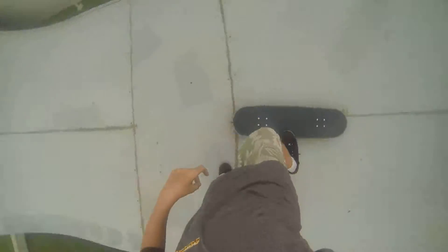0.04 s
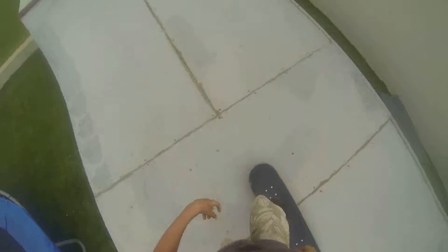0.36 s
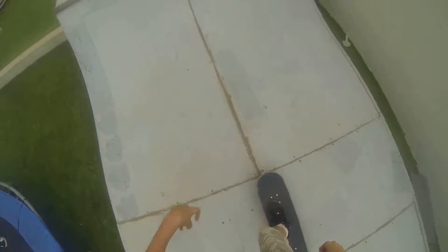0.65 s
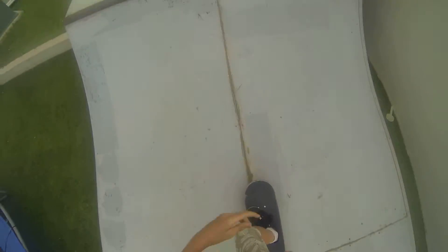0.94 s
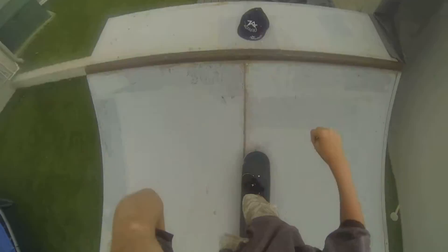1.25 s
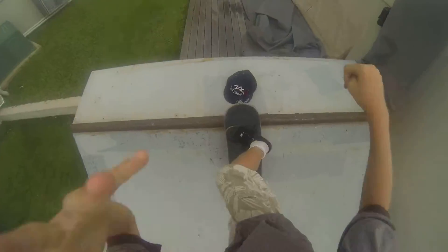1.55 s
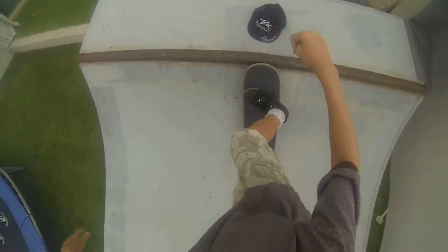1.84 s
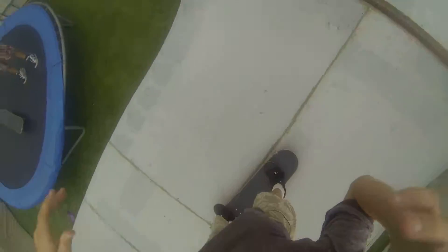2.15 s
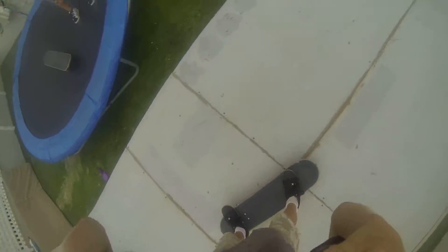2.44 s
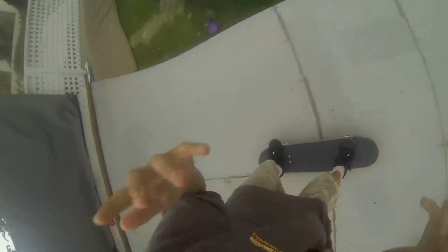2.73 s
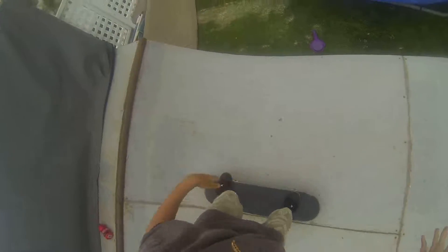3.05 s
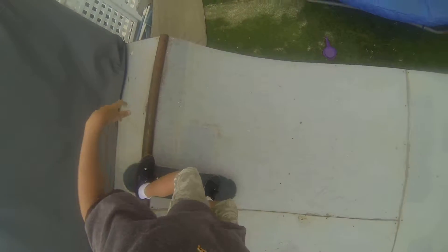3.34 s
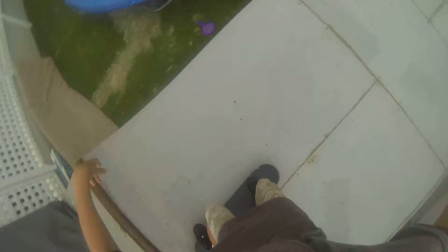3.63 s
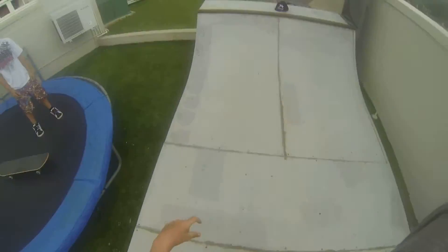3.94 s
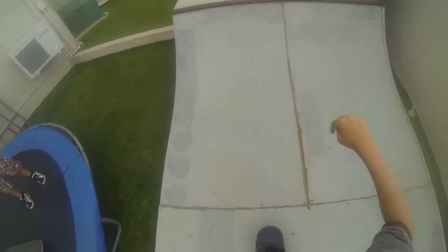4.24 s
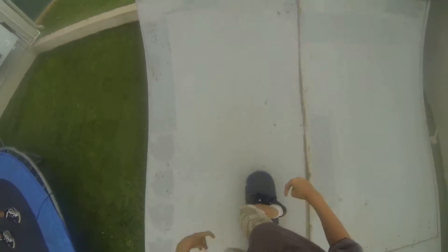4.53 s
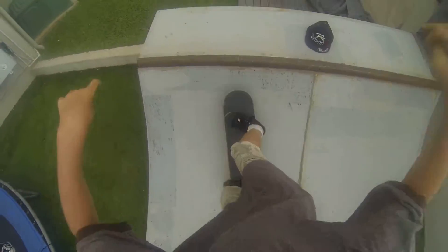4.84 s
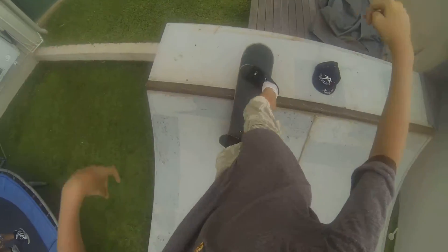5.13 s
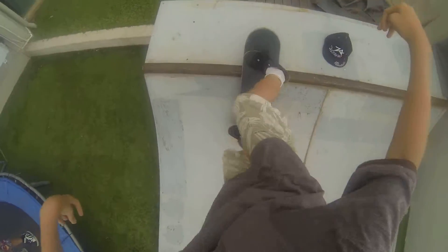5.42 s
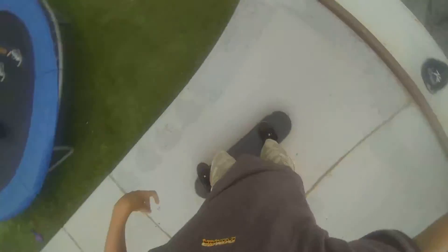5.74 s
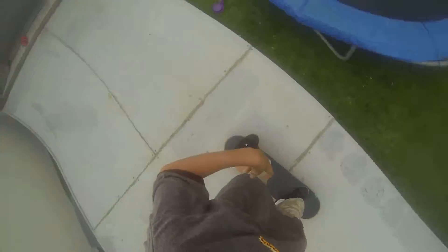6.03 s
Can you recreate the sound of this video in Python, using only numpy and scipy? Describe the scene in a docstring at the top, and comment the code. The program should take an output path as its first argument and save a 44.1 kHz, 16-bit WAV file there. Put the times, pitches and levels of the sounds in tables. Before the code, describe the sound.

A skateboard rolls back and forth on a wooden ramp with hollow rumble, sharp clacks, brief scrapes and low thumps on the microphone.

```python
"""On a plywood mini ramp, a skateboard rides back and forth, heard from a head-worn camera in a case.
The wheels hum, slide in the turns and knock over the panel joints. The deck (the wooden board) and
trucks (its metal axles) clack and grind on the ramp and its coping (the rail along the top edge).
The rider's movements thump the closed case, and each big thump turns the camera's volume down briefly.
Behind it all are dry ticks, a thin whine and the faint hiss of the electronics."""
import sys
import numpy as np
from scipy import signal
from scipy.fft import rfft, irfft
from scipy.io import wavfile

SR = 44100
rng = np.random.default_rng(int(sys.argv[2]) if len(sys.argv) > 2 else 0)


def wav_record(signal):
    """Record a signal, one row per channel, as 16-bit PCM in the file named by sys.argv[1]."""
    frames = np.transpose(np.atleast_2d(signal))
    bounded = np.clip(frames, -1, 1)
    # unit amplitude maps onto the largest positive 16-bit level
    quanta = np.round(bounded * 32767).astype(np.int16)
    wavfile.write(sys.argv[1], SR, quanta)


N = 272525
TIME = np.arange(N) / SR


# The tone of the flat floor, the curved wall and the humming wheels: pitch_hz, level_db
FLOOR_TONE = [(60, -21.5), (120, 1), (240, 0.5), (330, -10), (500, -20.5), (750, -20), (1100, -21.5),
              (1800, -33.5), (4000, -78.5)]
WALL_TONE = [(100, -20.5), (220, -13.5), (340, -1), (450, 0.5), (580, -0.5), (720, -7.5), (1100, -36),
             (1800, -24.5), (4000, -40)]
WHEEL_TONE = [(400, -44.5), (900, -4), (1180, -3), (1450, 4.5), (1750, -5.5), (2100, -13), (2600, -18.5),
              (5000, -25), (12000, -52)]
# How the rolling swells and fades: time_s, drum_db, hum_db (each before its trim)
ROLLING_LEVELS = [(0.0, -56, -60), (0.14, -54.5, -63), (0.79, -55, -51), (1.29, -50, -57.5),
                  (1.8, -57.5, -50.5), (2.11, -53, -49.5), (2.5, -48, -58), (2.66, -48, -87),
                  (2.83, -53, -53), (3.24, -51.5, -52), (3.59, -61, -62), (3.98, -52, -50.5),
                  (4.6, -51.5, -52.5), (4.92, -46.5, -48), (5.11, -66, -56.5), (5.76, -44, -50),
                  (5.94, -49, -49), (6.16, -47.5, -52.5)]

def rolling_wheels(drum_trim_db=2, hum_trim_db=-3.5, grit_db=1.5, bumps_db=2.0, bumps_per_s=70):
    """Wheels run over rough paint: the hollow ramp drums, and the wheels hum and scrub."""
    drum_db, hum_db = curves(ROLLING_LEVELS)
    slide, rasp = turns()
    blend = tone_blend(TIME)
    floor = np.sqrt(1 - blend) * with_tone(grit(N, grit_db), FLOOR_TONE)
    wall = np.sqrt(blend) * with_tone(grit(N, grit_db), WALL_TONE)  # bent wood is stiffer, so higher
    # Sliding makes the ramp drum too.
    drum = np.hypot(from_db(drum_db + drum_trim_db), from_db(0.5) * slide) * (floor + wall)
    hum = from_db(hum_db + hum_trim_db) * with_tone(grit(N, grit_db), WHEEL_TONE)
    wheels = drum + hum + wheel_scrub(slide, rasp)
    return wheels * from_db(bumps_db * drift(bumps_per_s))


# Sideways slides of the wheels: peak_s, slide_db, rise_s, fall_s, rasp_db
TURNS = [(.16, -48.5, 0.049, 0.069, -60), (.585, -47.5, 0.04, 0.031, -56.5), (.77, -56, 0.097, 0.033, -60),
         (1.14, -69, 0.032, .04, -75.5), (1.409, -54.5, 0.21, 0.38, -61.5), (1.62, -44, 0.079, 0.046, -55),
         (1.811, -46.5, 0.042, 0.03, -54.5), (1.93, -47.5, 0.054, 0.07, -62),
         (2.02, -47.5, 0.011, 0.023, -69), (2.26, -43.5, 0.038, 0.052, -55), (2.464, -48, 0.07, 0.053, -55),
         (2.61, -49, 0.035, 0.04, -53), (2.765, -45.5, 0.14, 0.068, -55.5), (3.51, -53.5, 0.017, 0.11, -67),
         (3.76, -53, 0.049, 0.12, -68), (3.971, -47.5, 0.04, 0.062, -52.5),
         (5.23, -46.5, 0.073, 0.08, -52.5), (5.38, -49, 0.031, 0.06, -58.5),
         (5.544, -43.5, 0.024, 0.032, -53)]

def turns():
    """How hard the wheels slide and rasp: both swell and die away in each turn."""
    slide, rasp = np.zeros(N), np.zeros(N)
    for peak_s, slide_db, rise_s, fall_s, rasp_db in TURNS:
        width_s = np.where(TIME < peak_s, rise_s, fall_s)
        swell = np.exp(-((TIME - peak_s) / width_s) ** 2)
        slide += from_db(slide_db) * swell
        rasp += from_db(rasp_db) * swell
    return slide, rasp


# The tone of sliding wheels and of their brighter rasp: pitch_hz, level_db
SCRUB_TONE = [(500, -14.5), (900, 2.5), (1450, 10), (2100, -1.5), (2700, -32), (3600, -22.5), (4400, -24),
              (5500, -19), (8000, -21.5), (11500, -41.5), (15000, -52)]
RASP_TONE = [(1200, -13), (2000, 7), (2600, 6.5), (3100, 2), (3700, 2), (4400, -7), (5300, -4.5),
             (8000, -30), (14000, -42)]

def wheel_scrub(slide, rasp):
    """Wheels dragged sideways make a coarse rubbing noise with a rasp on top."""
    rubbing = slide * with_tone(grit(N, spread_db=6.5), SCRUB_TONE)
    return rubbing + rasp * with_tone(grit(N, spread_db=6.0), RASP_TONE)


def wheel_squeak(start_s=3.712, pitch_hz=2750, fall_octaves_per_s=24, length_s=0.011):
    """A wheel sticks and slips for a moment in a turn, at a rough, falling pitch."""
    age = np.clip((TIME - start_s) / length_s, 0, 10)  # time since the start, in units of length_s
    waver = 1 + 0.0506 * drift(per_s=900)
    hz = pitch_hz * 2 ** (-fall_octaves_per_s * length_s * age) * waver
    swell = 2 * np.sqrt(age) * np.exp(-age ** 2 / 2)
    return from_db(-49) * swell * np.sin(2 * np.pi * np.cumsum(hz) / SR)


# The tone of the board when hit or scraped: pitch_hz, level_db
BOARD_TONE = [(80, -15), (250, 5), (370, -3.5), (600, -1.5), (950, -5), (1150, -6.5), (1450, -2),
              (2100, -12), (3000, -18), (5000, -27), (7000, -37.5), (11000, -45), (15000, -43)]
# Deck and trucks hit the ramp or coping:
# start_s, strike_db, rattle_db, decay_s, bright_db_per_octave, boom_db, boom_hz, deck_hz
CLACKS = [ (0.184, -52, -36.5, 0.011, 6, 16, 427, 1860), (.728, -49, -44, 0.0049, 14, -3, 400, 2300),
          (0.795, -44, -38.5, 0.0046, 11, 4, 300, 2270), (1.051, -46, -39.5, 0.0033, 10.5, 3, 400, 1850),
          (1.1716, -19, -20.5, 0.0069, 5.5, 6, 590, 2150), (1.201, -22, -22, 0.0045, 9.5, -15, 350, 1800),
          (1.2114, -44, -38, .002, 16, -2, 400, 2110), (1.428, -46, -38, 0.0054, 17, 28.5, 605, 1510),
          (1.459, -23.5, -37, 0.012, 7.5, 10, 466, 1230), (1.481, -21, -24, 0.006, 5.5, -2, 605, 2060),
          (1.564, -34, -20.5, 0.015, 5.5, 9, 520, 1320), (1.801, -34, -40, .005, 10, 13, 500, 1400),
          (1.815, -33, -29.5, 0.0059, 6, 12, 500, 1440), (1.893, -28, -35, 0.0091, 6, 10, 610, 1400),
          (2.187, -30, -19.5, 0.0057, 7.5, 26.5, 334, 1790), (2.286, -33, -35, .004, 4, 0, 500, 1900),
          (2.3284, -2.5, -29, 0.0068, -19, -32, 760, 1354),
          (2.3304, -12.5, -19.5, 0.0058, 4, -6, 606, 2110), (2.644, -34, -28, 0.0029, 12, 12.5, 420, 1720),
          (2.821, -45, -40, 0.015, 6, 8, 595, 1400), (3.145, -42, -45, 0.042, -38, 19, 443, 1380),
          (3.339, -19.5, -25.5, 0.012, -6, 5.5, 470, 1620), (3.351, -37, -39, .005, 12.5, 9, 480, 1590),
          (3.469, -37, -30.5, 0.025, -8, 11.5, 323, 1370), (3.713, -36, -36.5, 0.013, 0.5, -9, 660, 1450),
          (4.9494, -26, -18.5, 0.011, 2.5, 13, 520, 1400), (5.008, -43, -42, .004, 18, 0, 520, 1430),
          (5.1228, -5.5, -15.5, 0.0048, 6.5, 11.5, 756, 1517),
          (5.328, -41, -36.5, 0.0059, 11, 9, 600, 1600), (5.36, -37, -29, 0.006, 1.5, -3, 603, 1600),
          (5.387, -26, -35, 0.0069, 9, 23, 725, 1470), (5.447, -28, -23.5, 0.018, 6.5, 7, 730, 1440),
          (5.453, -13.5, -23.5, 0.013, 8.5, -6, 735, 1650)]
DECK_WIDTH_HZ, DECK_STRIKE_DB, DECK_RATTLE_DB = 500, 18.5, 7.5

def board_clacks(rise_s=0.00046, full_metal_blend=0.6, size=12000):
    """A hard strike rings the deck, then trucks and washers rattle until the rider's weight stops them."""
    out, age_s = np.zeros(N + 2 * size), np.arange(size) / SR
    for start_s, strike_db, rattle_db, decay_s, bright, boom_db, boom_hz, deck_hz in CLACKS:
        # A low blend gives a wooden slap; a high one adds the ring of the trucks.
        trucks = truck_ring(min(tone_blend(start_s) / full_metal_blend, 1) ** 2)
        strike_peaks = [(deck_hz, DECK_WIDTH_HZ, DECK_STRIKE_DB), *trucks]
        rattle_peaks = [(deck_hz, DECK_WIDTH_HZ, DECK_RATTLE_DB), *trucks]
        strike = tap_through_case(BOARD_TONE, bright - 0.9, boom_db, boom_hz, strike_peaks)  # duller
        rattle_tap = tap_through_case(BOARD_TONE, bright, boom_db, boom_hz, rattle_peaks)
        rise = 1 - np.exp(-age_s / rise_s)
        fade = np.exp(-age_s / decay_s - (age_s / (6.2 * decay_s)) ** 6)  # dies away, then stops short
        chatter = from_db(rattle_db) * grit(size, spread_db=5.5) * rise * fade
        start = int(start_s * SR)
        out[start:start + size] += signal.fftconvolve(chatter, rattle_tap)[:size]
        out[start:start + len(strike)] += from_db(strike_db) * strike / np.abs(strike).max()
    return out[:N]


# Pitches the metal trucks strengthen or weaken: pitch_hz, width_hz, boost_db
TRUCK_PEAKS = [(907, 170, 4), (1150, 150, -7), (2210, 97, 10.5), (2440, 180, 3.5), (3070, 310, -4.5),
               (3460, 130, 2.5), (3710, 180, 12), (4010, 92, 9), (4500, 420, -6.5), (4800, 170, 9),
               (5630, 600, -5.5), (6950, 390, 6)]

def truck_ring(metal_share, detune=0.015):
    """The pitches of the ringing trucks, shifted a little by the load and place of each contact."""
    return [(hz * (1 + detune * rng.standard_normal()), width_hz, metal_share * boost_db)
            for hz, width_hz, boost_db in TRUCK_PEAKS]


# The board scrapes along the ramp or coping, then lifts off:
# start_s, length_s, level_db, bright_db_per_octave, deck_hz, rise_s, metal_share (0 to 1)
GRINDS = [(1.19, 0.032, -34.5, 3.5, 2340, .001, .1), (1.59, 0.094, -46, 9, 1460, .0034, 0.6),
          (1.803, 0.038, -38, 6, 1400, 0.015, 1), (2.275, 0.019, -34.5, 6, 1790, 0.01, .2),
          (3.343, 0.053, -44, 5.5, 1520, 0.0033, 0.7), (3.474, 0.049, -43.5, 7.5, 1410, 0.0061, 0.1),
          (4.961, 0.053, -37.5, 7, 1420, .006, 0.96), (5.13, 0.0498, -29, 6.5, 1620, 0.011, 0.76),
          (5.468, 0.025, -33, 5.5, 1710, 0.0047, 0.9)]

def board_grinds(judder_db=3.0, fade_db_per_s=86, release_s=0.002):
    """The board sticks and slips, keeping deck and trucks ringing until the contact breaks."""
    out = np.zeros(N)
    slips = grit(N, spread_db=6.5) * from_db(judder_db * drift(per_s=220))
    for start_s, length_s, level_db, bright, deck_hz, rise_s, metal_share in GRINDS:
        age_s = np.clip(TIME - start_s, 0, length_s)
        contact = np.clip(np.minimum(age_s / rise_s, (length_s - age_s) / release_s), 0, 1)
        force = from_db(level_db - fade_db_per_s * age_s) * contact * slips
        peaks = [(deck_hz, DECK_WIDTH_HZ, DECK_RATTLE_DB), *truck_ring(metal_share)]
        tap = tap_through_case(BOARD_TONE, bright, boom_db=-3, boom_hz=595, peaks=peaks)
        out += signal.oaconvolve(force, tap)[:N]
    return out


# The notes of one plywood panel: pitch_multiple, level_db, ring_time_share
PANEL_NOTES = [(1.003, -4, 1), (1.3, -9.5, 0.47), (1.62, -26.5, 0.34)]
# The deep notes of the whole ramp: pitch_hz, level_db, ring_s
RAMP_NOTES = [(54.07, -40, 0.47), (110.5, -37, 0.025)]
# Dull knocks on the plywood, and a few soft, low thumps:
# time_s, peak_db, contact_s, pitch_hz, ring_db, ring_s
KNOCKS = [(0.777, -25, 0.00078, 269, -30, 0.087), (1.1735, 3.5, 0.00097, 263, -38.5, 0.12),
          (1.1764, -2.5, 0.00069, 271.5, -35.5, 0.12), (1.203, -10.5, 0.001, 293, -33, 0.056),
          (1.463, -8.5, 0.0018, 257, -37, 0.07), (1.485, -6.5, 0.0025, 246, -51.5, 0.054),
          (2.1917, -4, 0.002, 280, -38.5, 0.027), (2.3334, -5.5, 0.0012, 373, -32, 0.039),
          (2.645, -10.5, 0.0024, 254, -36, 0.029), (3.492, -22.5, 0.0021, 316, -64, .05),
          (5.127, -29, 0.00097, 204, -30.5, 0.091), (5.148, -19.5, 0.0055, 200, -53, .06),
          (5.175, -11.5, 0.0043, 200, -49, .06), (5.473, -18, 0.0029, 200, -66, .06)]

def panel_knocks():
    """Each knock is a short push that leaves one panel, and the whole ramp, ringing."""
    blows, panels = np.zeros(N), np.zeros(N)
    for time_s, peak_db, contact_s, pitch_hz, ring_db, ring_s in KNOCKS:
        blow = -push(time_s, peak_db, contact_s)
        blows += blow
        for multiple, level_db, share in PANEL_NOTES:
            panels += from_db(ring_db + level_db) * ring(blow, pitch_hz * multiple, share * ring_s)
    ramp_force = blows * (1 - tone_blend(TIME)) ** 2  # strongest when the tone is deep
    ramp = sum(from_db(db) * ring(ramp_force, hz, ring_s) for hz, db, ring_s in RAMP_NOTES)
    return blows + panels + ramp


# How the ramp's tone shifts: time_s, blend (0 to 1)
TONE_SHIFTS = [(0, 0.26), (.75, 0.045), (1.45, 0.12), (2.0, 0.5), (2.3, 0.029), (2.7, 0.076), (3.1, 0.34),
               (3.45, 0.21), (4.0, 0.28), (4.4, 0.35), (4.75, 0.78), (5.4, 0.49), (6.16, 0.13)]

def tone_blend(time_s):
    """The ramp's tone at this time: 0 is deep and wooden, 1 is higher and more metallic."""
    return np.clip(np.interp(time_s, *np.transpose(TONE_SHIFTS)), 0, 1)


# The tone of the case swaying and rumbling: pitch_hz, level_db
SWAY_TONE = [(3, -23.5), (8, 4.5), (14, 7.5), (22, 3), (30, -6), (45, -12), (70, -26.5), (130, -34),
             (400, -101)]
RUMBLE_TONE = [(25, -23), (48, -1), (62, 8.5), (90, -10.5), (130, -20), (250, -40.5), (700, -100)]
# How much the rider shakes the case: time_s, sway_db, rumble_db (each before its trim)
SHAKE_LEVELS = [(0.0, -23.5, -54), (0.77, -24.5, -28.5), (0.99, -22.5, -46.5), (1.41, -26, -43),
                (1.65, -15, -42), (2.09, -28.5, -46), (2.43, -20, -25), (3.05, -27, -43),
                (3.84, -24.5, -38), (4.26, -34.5, -40.5), (4.68, -25, -37.5), (5.06, -31, -29.5),
                (5.65, -20, -34.5), (6.16, -20, -37.5)]
# Jolts that reach the case through the rider's body: time_s, peak_db, push_s
THUMPS = [(0.210, -3.5, 0.0098), (0.325, -10, 0.015), (0.455, -7.5, 0.017), (0.752, -14, 0.02),
          (0.799, -10.5, 0.0085), (1.051, -6.5, 0.014), (1.211, 2.5, 0.0044), (1.472, -9, 0.0047),
          (1.815, -10, 0.028), (2.199, -8, 0.0039), (2.347, -8.5, 0.0081), (2.656, -13.5, 0.0029),
          (3.470, -14.5, 0.068), (5.010, -9.5, 0.0085), (5.157, -10, 0.0086), (5.187, -5, 0.012),
          (5.332, -9, 0.028), (5.489, -3, 0.0074), (5.608, -6.5, 0.014), (5.640, -5.5, 0.022),
          (5.735, -12.5, 0.036)]

def case_shaking(sway_trim_db=2.5, rumble_trim_db=-2.5):
    """The camera case sways and rumbles as the rider moves, and thumps on harder jolts."""
    sway_db, rumble_db = curves(SHAKE_LEVELS)
    sway = from_db(sway_db + sway_trim_db) * with_tone(rng.standard_normal(N), SWAY_TONE)
    rumble = from_db(rumble_db + rumble_trim_db) * with_tone(rng.standard_normal(N), RUMBLE_TONE)
    return sway + rumble + sum(push(*thump) for thump in THUMPS)


# Short runs of faint ticks: start_s, level_db, length_s, chance_of_each_tick (0 to 1)
TICK_RUNS = [(0.026, -39.5, .075, 0.26), (0.187, -29.5, 0.021, 0.59), (0.293, -37, 0.075, 0.38),
             (0.734, -37.5, 0.035, .7), (0.825, -32, .019, 0.73), (0.886, -35, .026, 0.4),
             (1.074, -33.5, 0.021, .9), (5.262, -35, 0.02, 0.4), (5.287, -30, .015, 0.6),
             (5.567, -33.5, 0.025, .6), (5.68, -34, .029, 0.7), (5.793, -37, 0.07, .45)]
# Single ticks that stand out: start_s, level_db
SINGLE_TICKS = [(0.361, -34.5), (0.459, -28.5), (0.469, -24.5), (0.478, -27.5), (.752, -27.5), (0.764, -29),
                (.846, -30), (1.879, -27.5), (2.367, -29), (2.531, -36), (5.351, -27.5), (5.355, -30),
                (5.620, -28.5), (5.639, -28), (5.651, -26.5), (5.749, -29.5), (5.758, -29.5), (5.762, -30)]

def crackle(ticks_per_s=345, spread_db=3, decay_s=0.0022, cutoff_hz=9500):
    """Dry ticks, alone and in quick runs: each is a sudden step that dies at once, with no ring."""
    ticks = np.zeros(N)
    for start_s, level_db, length_s, chance in TICK_RUNS:
        times = np.arange(start_s, start_s + length_s, 1 / ticks_per_s)
        dice, size = rng.random((2, 64))[:, :len(times)]
        strength = from_db(level_db + spread_db * (2 * size - 1))
        ticks[(times * SR).astype(int)] += (dice < chance) * strength
    for start_s, level_db in SINGLE_TICKS:
        ticks[int(start_s * SR)] += from_db(level_db)
    steps = signal.lfilter([1], [1, -np.exp(-1 / (decay_s * SR))], ticks + 1e-18)
    return filtered(steps, cutoff_hz, order=2)


# Moments when the whine drops in level: start_s, depth_db
WHINE_DIPS = [(.22, 15), (1.06, 8), (1.22, 29), (1.49, 2), (1.85, 8), (2.2, 1), (2.35, 26), (5.02, 7),
              (5.51, 10), (5.64, 16)]

def thin_whine(pitch_hz=10645, level_db=-76.5, return_db_per_s=104):
    """A faint, thin, high whine, made to fade briefly at the listed moments."""
    dip_db = np.zeros(N)
    for start_s, depth_db in WHINE_DIPS:
        dip_db += (TIME >= start_s) * np.maximum(depth_db - return_db_per_s * (TIME - start_s), 0)
    return from_db(level_db - dip_db) * unit_power(np.sin(2 * np.pi * pitch_hz * TIME))


# The tone of the hiss: pitch_hz, level_db
HISS_TONE = [(2000, 1), (5000, -6), (8000, -9.5), (11500, -9), (15000, -25.5)]

def camera_hiss(level_db=-63.5):
    """The electronics give off a faint, steady noise."""
    return from_db(level_db) * with_tone(rng.standard_normal(N), HISS_TONE)


# Pitches the case's shell and trapped air strengthen or weaken: pitch_hz, width_hz, boost_db
CASE_PEAKS = [(1105, 197, -4), (1432, 1100, 5.5), (1480, 260, 1), (2594, 210, 4.5), (3070, 300, -0.5),
              (3480, 440, 3.5), (3720, 630, 2.5), (4510, 500, -4), (5010, 580, 4)]

def tap_through_case(tone, bright=0, boom_db=0, boom_hz=650, peaks=(), size=8192):
    """One tap on something with this tone, heard inside the case (an impulse response of energy 1)."""
    hz = np.maximum(np.fft.rfftfreq(size, 1 / SR), 1)
    tone_hz, tone_db = np.transpose(tone)
    db = np.interp(np.log(hz), np.log(tone_hz), tone_db)
    db += bright * np.clip(np.log2(hz / 1700), 0, 2)  # tilt the two octaves above 1700 Hz
    db += boom_db * np.exp(-4 * np.log2(hz / boom_hz) ** 2)  # a broad, hollow boom
    for pitch_hz, width_hz, boost_db in [*CASE_PEAKS, *peaks]:
        db += boost_db / (1 + (2 * (hz - pitch_hz) / width_hz) ** 2)
    cepstrum = irfft(np.log(from_db(db)))
    cepstrum[size // 2:] = 0  # minimum phase: nothing sounds before the tap
    tap = irfft(np.exp(2 * rfft(cepstrum)))
    return tap / np.sqrt(np.sum(tap ** 2))


def with_tone(force, tone):
    """Give a steady force this tone, as heard inside the case, at power 1."""
    return unit_power(signal.fftconvolve(force, tap_through_case(tone))[:N])


def grit(count, spread_db):
    """Countless tiny contacts of uneven size."""
    return unit_power(rng.standard_normal(count) * from_db(spread_db * rng.standard_normal(count)))


def push(time_s, peak_db, width_s):
    """A soft blow: a pressure peak with a shallow dip on both sides. Shorter ones sound brighter."""
    distance_squared = ((TIME - time_s) / width_s) ** 2
    return from_db(peak_db) * (1 - distance_squared) / (1 + distance_squared) ** 2


def ring(force, hz, ring_s):
    """A force sets one note ringing; it fades by 60 dB in ring_s."""
    fade, angle = from_db(-60 / (ring_s * SR)), 2 * np.pi * hz / SR
    return signal.lfilter([0, np.sin(angle)], [1, -2 * fade * np.cos(angle), fade ** 2], force + 1e-18)


def drift(per_s):
    """A random wobble that changes about per_s times a second."""
    points = rng.standard_normal(N // 20)
    return unit_power(np.interp(TIME * per_s, np.arange(len(points)), points))


def curves(rows):
    """Join timed rows with straight lines, one curve for each column after the time."""
    times, *columns = np.transpose(rows)
    return [np.interp(TIME, times, column) for column in columns]


def filtered(x, hz, order, keep="low"):
    """Keep the sound below hz ("low") or above it ("high")."""
    return signal.sosfilt(signal.butter(order, hz, keep, fs=SR, output="sos"), x)


def unit_power(x):
    """Scale a signal to an average power of 1."""
    return x / np.sqrt(np.mean(x ** 2) + 1e-20)


def from_db(db):
    """Turn decibels into a multiplier."""
    return 10 ** (np.asarray(db) / 20)


def scene():
    """The skateboard on the ramp, with the shaking case and the faint background, in mono."""
    hiss = camera_hiss()
    skateboard = rolling_wheels() + wheel_squeak() + board_clacks() + board_grinds() + panel_knocks()
    return (skateboard + case_shaking() + crackle() + thin_whine() + hiss)[None]


def auto_volume(x, threshold_db=-15.5, deepest_db=13, return_db_per_s=80, lag_s=0.00096, attack_s=0.011):
    """Big bass swings make the camera turn its volume down; it climbs back at a steady rate."""
    bass = filtered(x[0], hz=50, order=2)
    bass = filtered(bass, hz=14, order=1, keep="high")
    bass_db = 20 * np.log10(np.abs(bass) + 1e-9)
    wanted_cut_db = np.clip(1.52 * (bass_db - threshold_db), 0, deepest_db)
    climb_db = return_db_per_s * TIME
    held_cut_db = np.maximum.accumulate(wanted_cut_db + climb_db) - climb_db
    late_cut_db = np.interp(TIME - lag_s, TIME, held_cut_db)
    smoothing = np.exp(-1 / (attack_s * SR))
    cut_db = signal.lfilter([1 - smoothing], [1, -smoothing], late_cut_db)
    return x * from_db(-cut_db)


def record(dry, fizz_above=0.35, fizz_db=-39, treble_hz=8500, cutoff_hz=15500):
    """The volume ducks on thumps, loud peaks fizz, and the treble is softened and cut off at the top."""
    sound = auto_volume(dry)
    excess = np.clip(np.abs(sound) - fizz_above, 0, 1)
    sound = sound + from_db(fizz_db) * excess * rng.standard_normal(N)
    sound = sound / (1 + sound ** 8) ** (1 / 8)  # round off peaks near full scale
    sound = filtered(sound, treble_hz, order=1)
    return signal.sosfilt(signal.cheby2(12, 70, cutoff_hz, fs=SR, output="sos"), sound)


dry = scene()
out = record(dry)
wav_record(out)
```